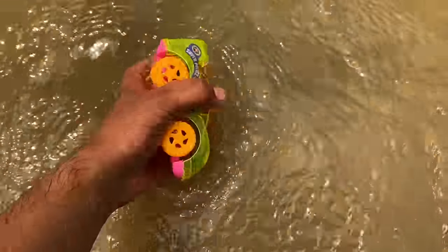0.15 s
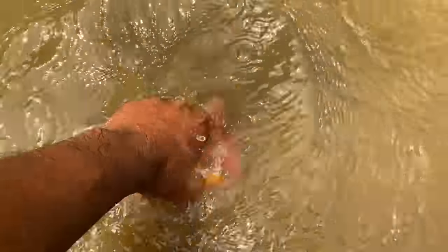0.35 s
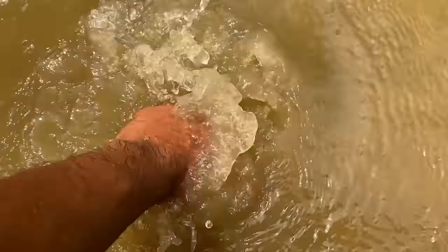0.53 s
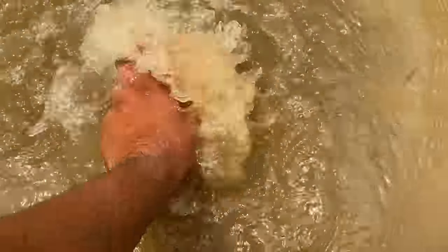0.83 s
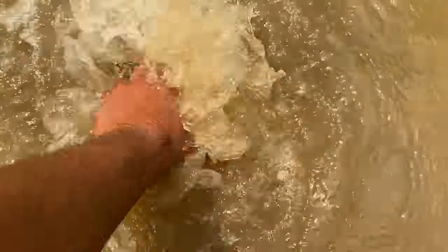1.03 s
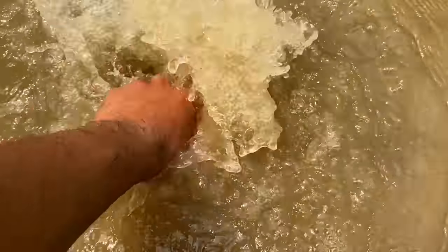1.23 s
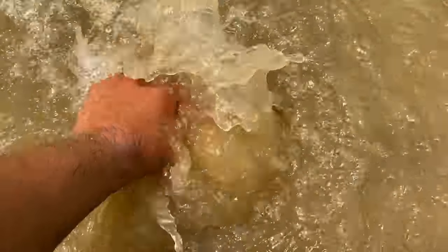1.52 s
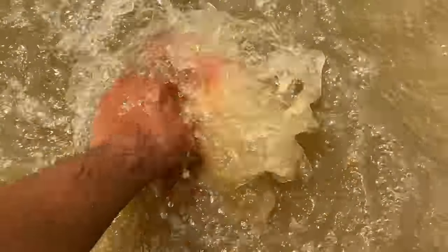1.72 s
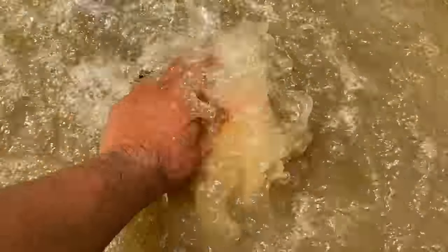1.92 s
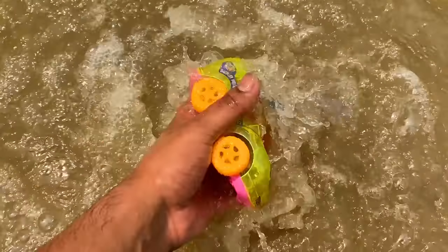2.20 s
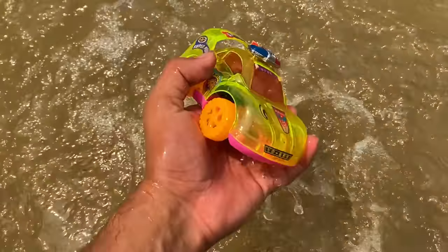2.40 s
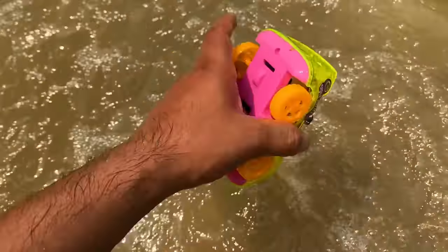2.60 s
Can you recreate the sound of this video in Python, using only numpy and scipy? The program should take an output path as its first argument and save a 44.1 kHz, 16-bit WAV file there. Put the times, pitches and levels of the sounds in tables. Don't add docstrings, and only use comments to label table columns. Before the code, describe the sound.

Vigorous water splashing as a hand shakes a hollow plastic toy in shallow water

```python
import sys
import numpy as np
from scipy import signal
from scipy.fft import rfft, irfft, next_fast_len
from scipy.io import wavfile

SR = 44100
rng = np.random.default_rng(int(sys.argv[2]) if len(sys.argv) > 2 else 0)


def generate_wav(signal):
    frames = np.transpose(np.atleast_2d(signal))
    scaled = np.clip(frames, -1, 1) * 32767
    pcm = np.round(scaled).astype(np.int16)
    wavfile.write(sys.argv[1], SR, pcm)


def convert_level_to_amplitude(level_db):
    exponent = np.asarray(level_db, float) / 20
    return 10 ** exponent


N = 121275


def rms_one(x):
    return x / np.sqrt(np.mean(x ** 2) + 1e-20)


def in_time(rows):
    s, *columns = np.transpose(rows)
    return [np.interp(np.arange(N) / SR, s, column) for column in columns]


def at_hz(points, hz):
    table_hz, values = np.transpose(points)
    return np.interp(np.log(hz + 1), np.log(table_hz), values)


def drift(rate):
    r = np.exp(-80 * np.pi * rate / SR)
    slow = signal.lfilter([1], [1, -2 * r, r * r], rng.standard_normal(N // 40 + 2002))[2000:]
    return np.interp(np.arange(N) / 40, np.arange(len(slow)), slow / slow.std())


def add(out, s, sound):
    i = int(max(s, 0) * SR)
    out[i:i + len(sound)] += sound[:len(out) - i]


def bubble(hz, cycles, rise, attack_s):
    cycles = max(cycles, 2)
    t = np.arange(int(SR * (cycles / hz + 4 * attack_s))) / SR
    ring = np.sin(2 * np.pi * hz * t * (1 + .5 * rise * hz * t))
    return ring * (1 - np.exp(-t / attack_s)) * convert_level_to_amplitude(-60 * t * hz / cycles)


def banded_noise(spectrum, low_hz, count, patchy_db, rate):
    out, together, white = 0, drift(rate), rng.standard_normal((2, N))
    for k in range(count):
        low = low_hz * 2 ** (k / 2)
        high = min(low * 2 ** .5, .45 * SR)
        band_filter = signal.butter(2, [low, high], "band", fs=SR, output="sos")
        band = signal.sosfilt(band_filter, white[k % 2])
        flicker_db = patchy_db * (together + .6 * drift(rate))
        out = out + band * convert_level_to_amplitude(at_hz(spectrum, low * 2 ** .25) + flicker_db)
    return rms_one(out)


def grains(per_s, spread_db, clump):
    sizes = convert_level_to_amplitude(spread_db * np.minimum(rng.exponential(1, N), 3.5)) * rng.choice([-1, 1], N)
    return sizes * (rng.random(N) < per_s * clump / SR)


def swarm(clicks, low_hz, high_hz, cycles, rise, tilt_db):
    dealt, out = rng.integers(0, 24, N), np.zeros(N)
    for k, hz in enumerate(np.geomspace(low_hz, high_hz, 24)):
        shape = bubble(hz, cycles, rise, 0.35 / hz) * convert_level_to_amplitude(tilt_db * np.log2(hz / low_hz))
        out += signal.fftconvolve(clicks * (dealt == k), shape)[:N]
    return rms_one(out)


def stroke_lift():
    # crest_s, lift_db, length_s
    stroke_table = [(0.236, 18.5, 0.035), (0.322, 10, 0.11), (0.428, 11, 0.013), (0.543, 12, 0.18),
                    (0.775, 11, 0.17), (0.945, 5.5, 0.087), (1.075, 8.5, 0.015), (1.115, 3, 0.052),
                    (1.295, 2.5, 0.057), (1.489, 7.5, 0.051), (1.554, 8, 0.027), (1.699, 7, 0.12),
                    (1.865, 6.5, 0.15), (2.04, 7.5, 0.18), (2.494, 6.5, 0.017), (2.62, 3, 0.036)]
    rise_share = 0.46
    t, lift_db = np.arange(N) / SR, 0
    for crest_s, db, length_s in stroke_table:
        side_s = length_s * np.where(t < crest_s, rise_share, 1)
        lift_db = lift_db + db * np.exp(-2 * ((t - crest_s) / side_s) ** 2)
    return lift_db


def churn():
    # time_s, thrown_water_db, trapped_air_db
    stir_table = [(0, -45, -47), (.22, -53.5, -61), (.26, -51, -52.5), (.47, -47, -36), (.71, -44, -44.5),
                  (1.0, -39, -34.5), (1.4, -32.5, -30), (1.6, -36.5, -30.5), (2.0, -38.5, -31.5),
                  (2.3, -37, -43), (2.55, -45.5, -50), (2.68, -40.5, -44.5)]
    # pitch_hz, level_db (per Hz)
    spray_colour = [(150, -16), (400, -12), (800, 21), (1500, -64), (2600, 19.5), (5000, -9), (8000, -13),
                    (15000, -72.5)]
    thrown_db, air_db = in_time(stir_table)
    lift_db = stroke_lift()
    thrown_db = thrown_db + lift_db
    air_db = air_db + 0.68 * lift_db
    clump = convert_level_to_amplitude(4 * drift(22) + .45 * (thrown_db - thrown_db.mean()))

    spray = convert_level_to_amplitude(-6) * banded_noise(spray_colour, 155.0, count=14, patchy_db=1.8, rate=15.0)
    drop_clicks = grains(2300, 3.3, clump)
    drops = convert_level_to_amplitude(5.5) * swarm(drop_clicks, 1200, 6000, cycles=18, rise=0.0014, tilt_db=-7.5)
    fizz_clicks = grains(5000, 3.3, clump)
    fizz = convert_level_to_amplitude(-3) * swarm(fizz_clicks, 3480, 20600, cycles=10, rise=0.0067, tilt_db=-0.5)
    tick_filter = signal.butter(1, [2500, 14000], "band", fs=SR)
    ticks = convert_level_to_amplitude(-7.5) * rms_one(signal.lfilter(*tick_filter, grains(220, -1.5, clump)))
    thrown = convert_level_to_amplitude(thrown_db) * (spray + drops + fizz + ticks)

    gurgle_clicks = grains(1000, 2.8, clump)
    gurgle = swarm(gurgle_clicks, 200, 950, cycles=17, rise=.008, tilt_db=8)
    deep = signal.lfilter(*signal.butter(1, 450, fs=SR), gurgle)
    deep = convert_level_to_amplitude(air_db - air_db.max() - 20) * deep
    return thrown + convert_level_to_amplitude(air_db + 0.5) * (gurgle + deep)


def plops():
    # start_s, peak_db, pitch_hz
    plop_table = [(0.046, -42, 592), (0.069, -31, 1200), (0.089, -31, 1280), (0.103, -34, 740),
                  (0.12, -39, 524), (0.182, -38, 650), (0.255, -25, 880), (0.271, -15, 810),
                  (0.281, -13, 780), (0.379, -18.5, 864), (0.515, -22.5, 704), (0.735, -21.5, 683),
                  (0.761, -24.5, 450), (0.943, -20.5, 610), (1.118, -22.5, 655), (1.136, -21, 274),
                  (1.184, -18.5, 640), (1.409, -20, 616), (1.488, -20, 342), (1.503, -7, 977),
                  (1.712, -22, 292), (1.783, -12.5, 675), (1.855, -12, 614), (1.876, -0.5, 1220),
                  (1.94, -16, 897), (2.004, -23.5, 410), (2.307, -22, 750), (2.378, -13, 1000),
                  (0.003, -41, 685), (0.003, -31, 1260), (0.022, -59, 760), (0.421, -26.5, 337),
                  (0.533, -29, 344), (0.958, -18, 520), (1.069, -18, 960), (1.274, -24.5, 374),
                  (1.373, -22, 500), (1.396, -18, 205), (1.632, -22, 673), (1.737, -16, 1080),
                  (2.076, -19, 614), (2.124, -22, 593), (2.18, -33, 800), (2.475, -28.5, 950),
                  (2.476, -25, 1700), (2.506, -21, 1650), (2.574, -40, 780), (2.62, -32, 1680),
                  (2.623, -25, 845), (2.666, -29, 910), (2.667, -23, 1770), (2.721, -29, 910),
                  (2.741, -28.5, 820)]
    attack_s, rise, gain_db, overtone_db = 0.0016, 0.007, 10.5, -11
    cycles, deep_hz = 20, 600
    out = np.zeros(N)
    ratios = rng.uniform(.9, 1.1, (len(plop_table), 2)) * [2, 3.2]
    for (s, db, hz), upper in zip(plop_table, ratios):
        level = convert_level_to_amplitude(db + gain_db)
        add(out, s, level * bubble(hz, cycles * min(hz / deep_hz, 1), rise, attack_s))
        for ratio in upper:
            add(out, s, level * convert_level_to_amplitude(overtone_db) * bubble(hz * ratio, cycles, rise, attack_s / 2))
    return out * (1 + .45 * drift(150))


def glugs():
    # start_s, length_s, from_hz, to_hz, level_db
    glug_table = [(0.295, 0.076, 812, 418.3, -22.5), (0.352, 0.065, 489, 275, -30.5),
                  (0.471, 0.026, 647, 900, -21.5), (.47, 0.056, 227.5, 128, -25.5),
                  (0.832, 0.04, 504, 705, -29), (1.277, 0.079, 702, 654, -21),
                  (1.505, 0.059, 241.6, 172, -17), (1.513, 0.05, 98.5, 68, -8),
                  (1.519, 0.028, 320, 204, -31), (1.582, 0.033, 345, 800, -20.5),
                  (1.786, 0.0706, 691, 1060, -18.5), (2.241, 0.052, 765, 964, -24.5),
                  (2.393, 0.052, 759, 1250, -23), (0.881, 0.054, 75, 62, -24), (1.07, 0.052, 90, 74.5, -25),
                  (1.845, 0.05, 93.6, 80, -21.5), (1.959, 0.038, 99, 84.5, -26),
                  (2.042, 0.051, 112.7, 94, -22.5), (2.619, 0.029, 65, 55, -28)]
    flutters_per_s = 90
    out, wobble = np.zeros(N), 1 + .06 * drift(flutters_per_s)
    for s, length_s, from_hz, to_hz, db in glug_table:
        hz = np.geomspace(from_hz, to_hz, int(length_s * SR))
        hz = hz * wobble[int(s * SR):][:len(hz)]
        note = np.sin(2 * np.pi * np.cumsum(hz) / SR)
        add(out, s, convert_level_to_amplitude(db) * note * np.sqrt(np.hanning(len(hz))))
    return out * (1 + .5 * drift(flutters_per_s))


def sloshes():
    # start_s, length_s, pitch_hz, level_db
    slosh_table = [(0.23, 0.029, 870, -26), (0.377, 0.12, 840, -32.5), (0.513, 0.073, 700, -32.5),
                   (0.632, 0.064, 860, -33), (0.747, 0.15, 770, -30), (0.9, 0.098, 750, -23),
                   (1.005, 0.12, 840, -25.5), (1.105, 0.076, 680, -20.5), (1.241, 0.097, 764, -22),
                   (1.373, 0.089, 650, -21.5), (1.665, 0.023, 510, -32), (1.826, 0.081, 670, -21),
                   (1.957, 0.081, 740, -27.5), (2.044, 0.074, 723, -19.5), (2.113, 0.11, 710, -23.5),
                   (2.258, 0.082, 835, -31.5), (2.586, 0.043, 920, -36), (2.692, 0.07, 950, -41),
                   (2.292, 0.28, 1530, -44)]
    half_width = .55 / 2
    out, noise = np.zeros(N), rng.standard_normal(N) * convert_level_to_amplitude(3 * drift(70))
    for s, length_s, hz, db in slosh_table:
        edges_hz = [hz * (1 - half_width), hz * (1 + half_width)]
        band = signal.butter(2, edges_hz, "band", fs=SR, output="sos")
        piece = noise[int(s * SR):][:int(length_s * SR)]
        cloud = rms_one(signal.sosfilt(band, piece))
        add(out, s, convert_level_to_amplitude(db) * cloud * np.sqrt(np.hanning(len(cloud))))
    return out


def slaps():
    # start_s, peak_db, colour_hz
    slap_table = [(0.071, -23, 2180), (0.181, -25, 2560), (0.2456, -12.5, 2680), (0.2556, -16.5, 2520),
                  (0.3071, -15.5, 1920), (0.379, -24, 2400), (0.7655, -16, 2200), (0.8064, -10, 2020),
                  (0.8407, -12.5, 2050), (0.9366, -11, 2300), (1.08, -13.5, 5600), (1.286, -6.5, 2620),
                  (1.3737, -6.5, 4300), (1.4242, -9.5, 2200), (1.4674, -12, 2120), (1.558, -10, 3440),
                  (1.6555, -8, 2750), (1.695, -8.5, 2620), (2.1402, -16.5, 2440), (0.958, -13, 2460),
                  (1.198, -16, 2410), (2.377, -17.5, 4000), (2.4106, -17.5, 3530), (2.4627, -19, 7000),
                  (2.652, -18, 1870)]
    attack_s, fade_s, gain_db, wide_db = 0.0011, 0.032, -4.5, -9.5
    out, t = np.zeros(N), np.arange(SR // 8) / SR
    shape = (1 - np.exp(-t / attack_s)) * convert_level_to_amplitude(-60 * t / fade_s)
    wide_filter = signal.butter(1, [900, 9000], "band", fs=SR)
    noise = rng.standard_normal((len(slap_table), len(t)))
    for (s, db, hz), burst in zip(slap_table, noise):
        tone = rms_one(signal.lfilter(*signal.iirpeak(hz, 1 / 0.19, SR), burst))
        wide = rms_one(signal.lfilter(*wide_filter, burst[::-1]))
        add(out, s, convert_level_to_amplitude(db + gain_db) * shape * (tone + convert_level_to_amplitude(wide_db) * wide))
    return out


def snaps():
    # start_s, peak_db
    snap_table = [(0.1032, -24), (0.2803, -10.5), (0.3092, -11), (1.0485, -15), (1.0824, -5.5), (1.375, -9),
                  (1.5524, -9), (1.6965, -5.5), (2.2717, -12), (2.4638, -25), (0.2423, -11), (0.3521, -21),
                  (0.4085, -20), (0.7921, -27), (0.8385, -14), (0.9657, -29), (1.1278, -16), (1.277, -28),
                  (1.4566, -11), (1.568, -14), (1.6247, -13), (1.6477, -11), (1.7195, -24), (1.8347, -17),
                  (1.9664, -11), (2.2288, -22)]
    attack_s, fade_s, gain_db = 0.0011, .005, 7.5
    out, t = np.zeros(N), np.arange(SR // 20) / SR
    shape = convert_level_to_amplitude(gain_db - 60 * t / fade_s) * (1 - np.exp(-t / attack_s))
    noise = rng.standard_normal((len(snap_table), len(t)))
    bright = signal.lfilter(*signal.butter(2, 3800, "high", fs=SR), noise)
    for (s, db), crack in zip(snap_table, bright):
        add(out, s, convert_level_to_amplitude(db) * shape * crack)
    return out


def surges():
    # time_s, level_db
    heave_table = [(0, -43.5), (.28, -34.5), (.45, -27.5), (.69, -39), (.75, -28.5), (.85, -37), (.9, -22),
                   (.98, -43), (1.1, -27), (1.29, -49.5), (1.55, -17), (1.62, -30), (1.85, -23.5),
                   (1.95, -37), (2.05, -23.5), (2.3, -39), (2.47, -32), (2.58, -38.5)]
    # pitch_hz, level_db (per Hz)
    surge_colour = [(20, -77), (43, -2), (70, 3), (120, -5.5), (170, -18.5), (300, -63)]
    heave_db = in_time(heave_table)[0]
    return convert_level_to_amplitude(heave_db) * banded_noise(surge_colour, 25.4, count=8, patchy_db=2.5, rate=12)


def faint_floor():
    return convert_level_to_amplitude(-52.5) * signal.lfilter([1], [1, -.5], rng.standard_normal(N))


def ports(x):
    # pitch_hz, width_hz, level_db
    housing_table = [(1950, 830, 1.5), (2620, 22, 6), (4390, 230, 4), (6200, 170, 3)]
    # pitch_hz, level_db
    right_gain = [(150, 0), (400, -1), (550, -9), (750, -4), (1250, -6), (1650, 0), (2600, -1), (5000, -6),
                  (8000, 0)]
    # pitch_hz, share (0 to 1)
    common_table = [(350, .95), (1500, .87), (2600, .8), (3400, .45), (5200, .35), (6800, .98), (8000, .99)]
    # pitch_hz, phase_radians
    phase_table = [(0, 0), (1600, -3.14), (2550, -6.3), (3200, -7.0), (3800, -5.5), (4400, -6.3),
                   (6690, -6.283)]
    size = next_fast_len(N + 4096)
    hz = np.arange(size // 2 + 1) * SR / size
    ring_db = sum(db / (1 + ((hz - f) / width * 2) ** 2) for f, width, db in housing_table)
    scattered = x * drift(150)
    left, stray = rfft([x, scattered], size) * convert_level_to_amplitude(ring_db)

    edge_hz, lead_s = phase_table[-1][0], 1 / 4460
    phase = np.interp(hz, *np.transpose(phase_table))
    phase = phase + 2 * np.pi * lead_s * np.maximum(hz - edge_hz, 0)
    common = np.clip(at_hz(common_table, hz), 0, 1)
    right = np.sqrt(common) * left + np.sqrt(1 - common) * stray
    right = convert_level_to_amplitude(at_hz(right_gain, hz)) * right * np.exp(1j * phase)
    return irfft(np.array([left, right]), size)[:, :N]


def scene():
    water = churn() + plops() + glugs() + sloshes() + slaps() + snaps() + surges()
    own_surge = convert_level_to_amplitude(-10) * surges() * [[1], [-1]]
    return ports(water + faint_floor()) + own_surge


def band_limit(x):
    return signal.sosfilt(signal.butter(12, 16990, fs=SR, output="sos"), x)


def record(dry):
    limit = 1.1
    rounded = limit * np.tanh(dry / limit)
    top_cut = signal.cheby2(16, 55, 16050, fs=SR, output="sos")
    rumble_cut = signal.butter(2, 27.4, "high", fs=SR, output="sos")
    mix = signal.sosfilt(rumble_cut, signal.sosfilt(top_cut, rounded))
    return band_limit(mix)


dry = scene()
out = record(dry)
generate_wav(out)
```